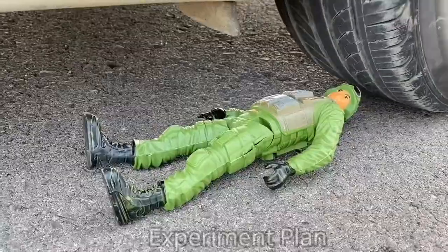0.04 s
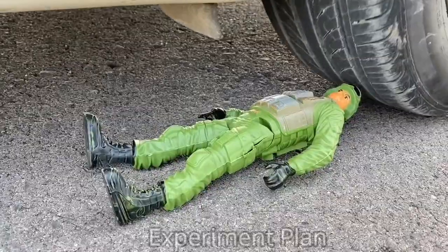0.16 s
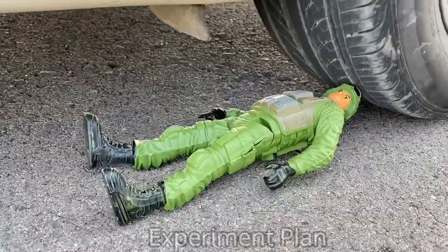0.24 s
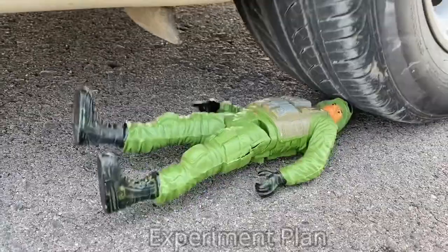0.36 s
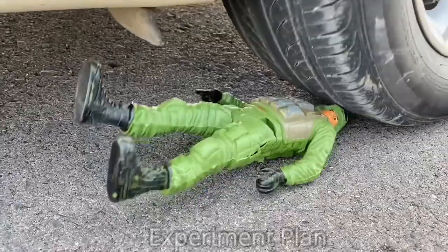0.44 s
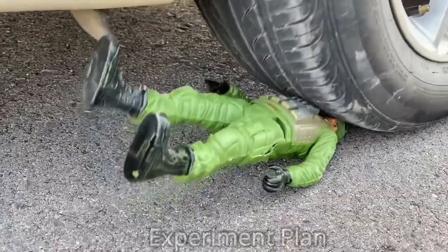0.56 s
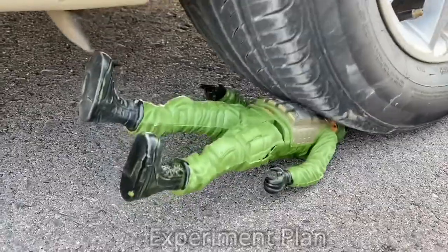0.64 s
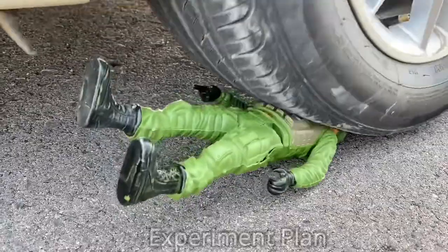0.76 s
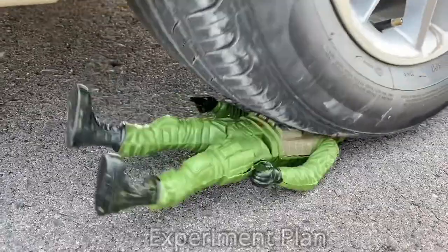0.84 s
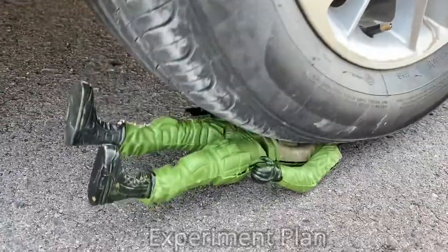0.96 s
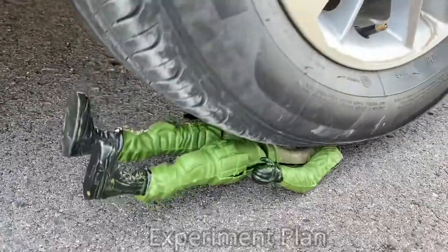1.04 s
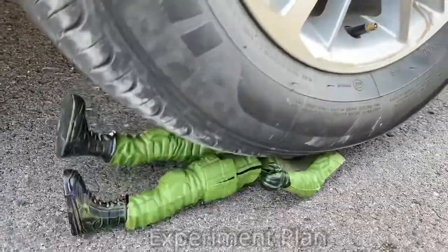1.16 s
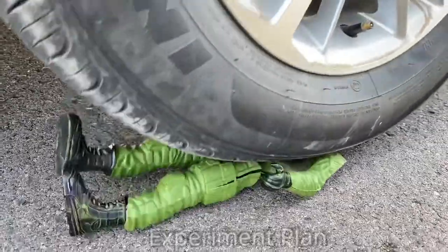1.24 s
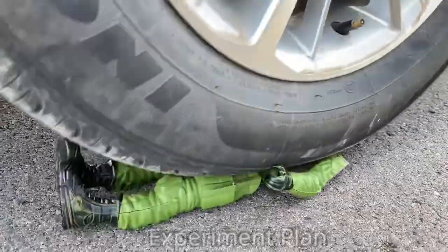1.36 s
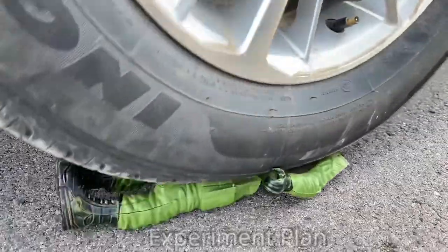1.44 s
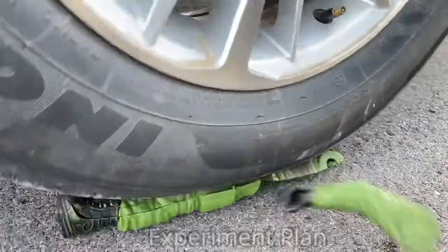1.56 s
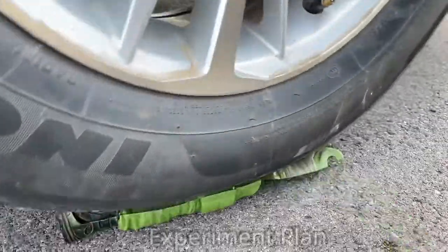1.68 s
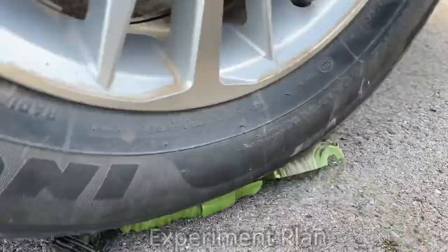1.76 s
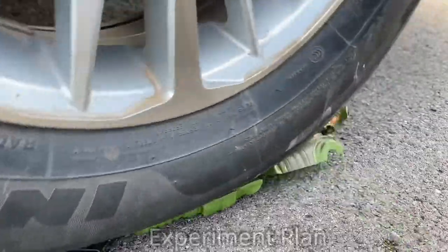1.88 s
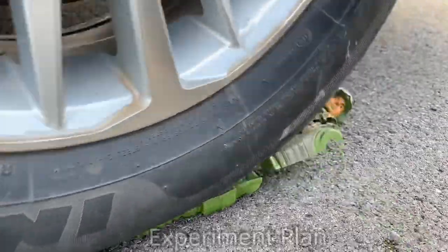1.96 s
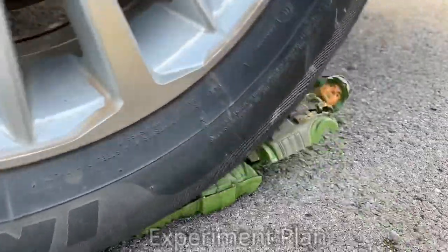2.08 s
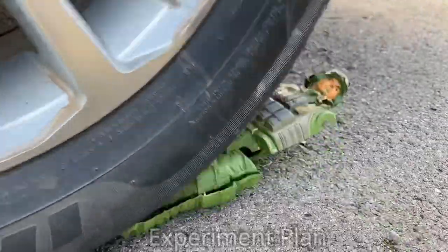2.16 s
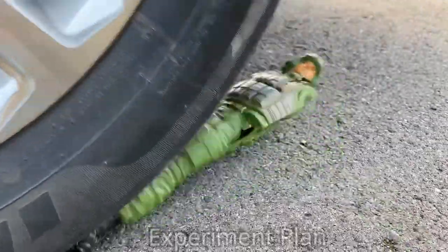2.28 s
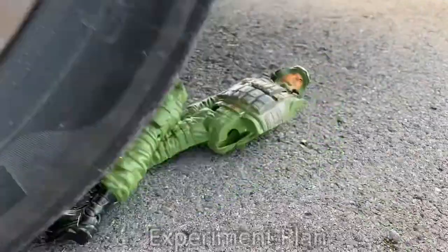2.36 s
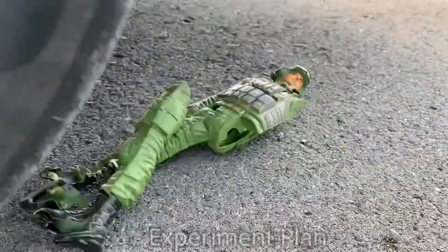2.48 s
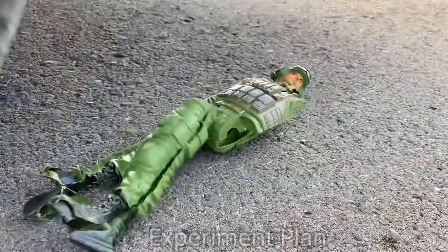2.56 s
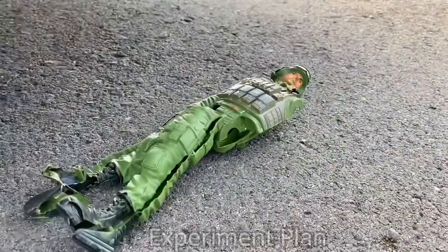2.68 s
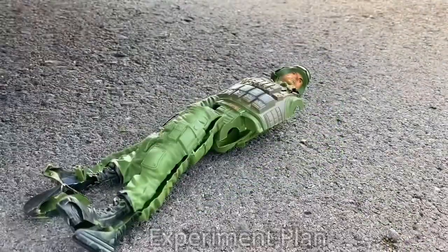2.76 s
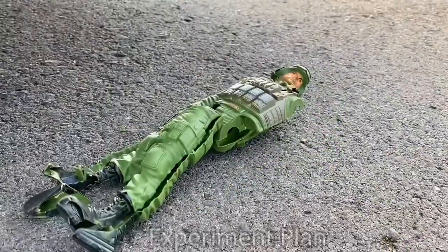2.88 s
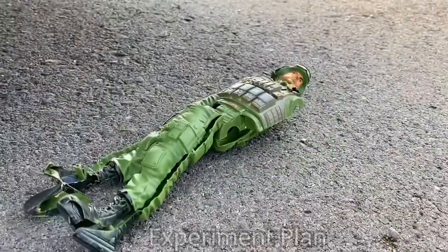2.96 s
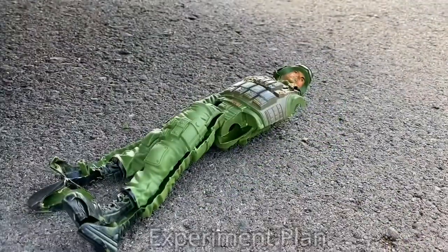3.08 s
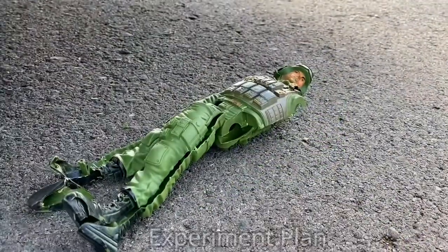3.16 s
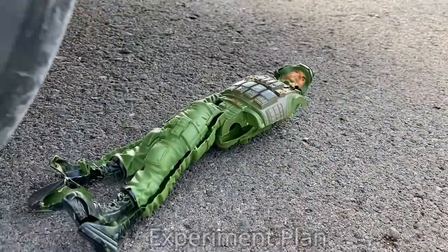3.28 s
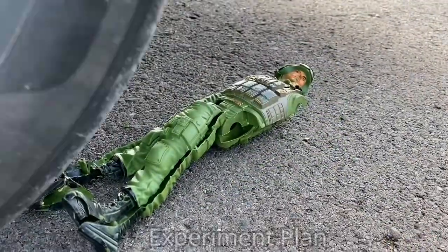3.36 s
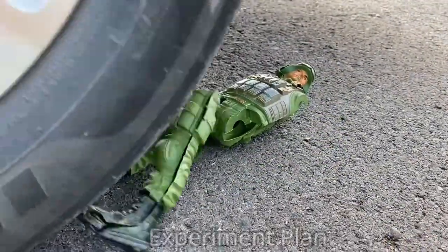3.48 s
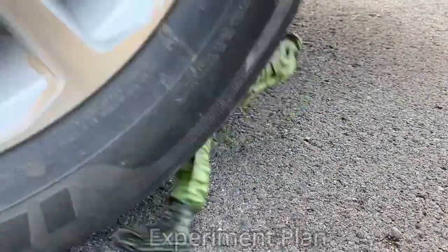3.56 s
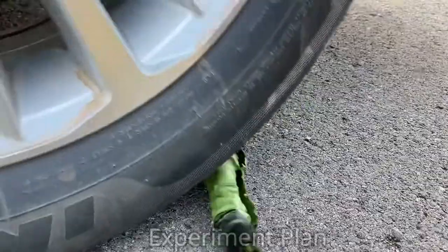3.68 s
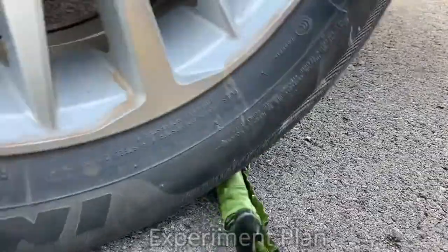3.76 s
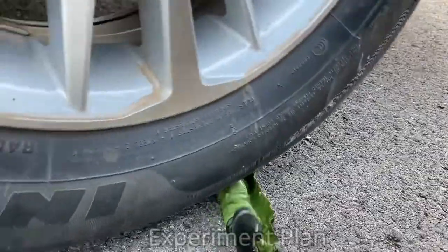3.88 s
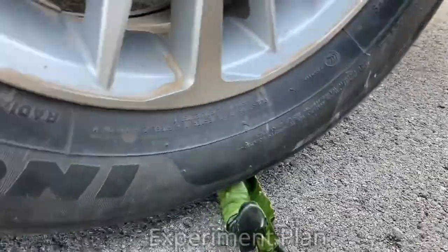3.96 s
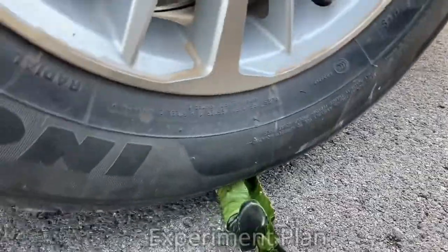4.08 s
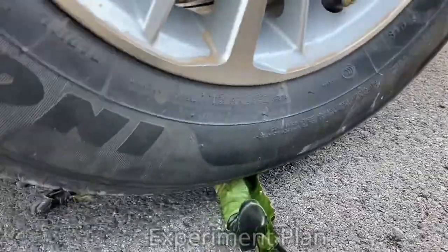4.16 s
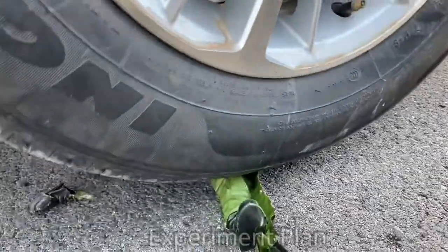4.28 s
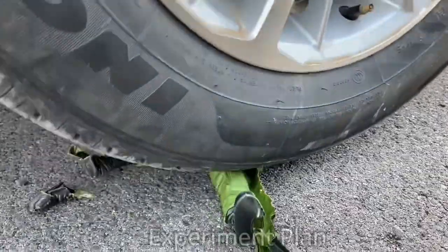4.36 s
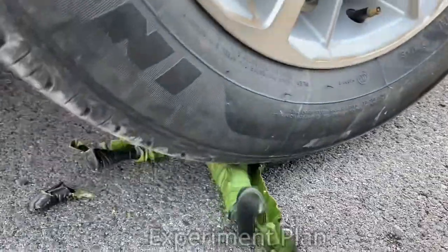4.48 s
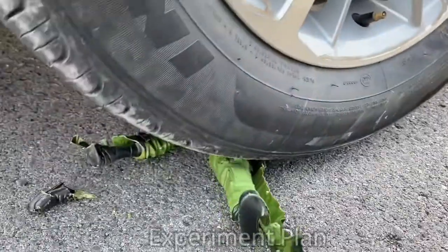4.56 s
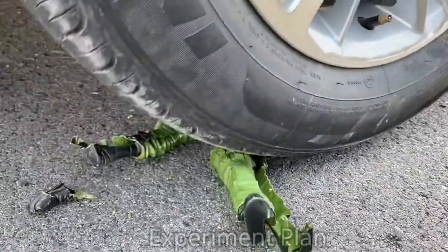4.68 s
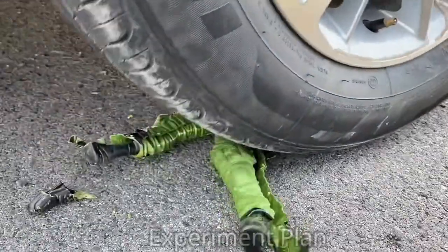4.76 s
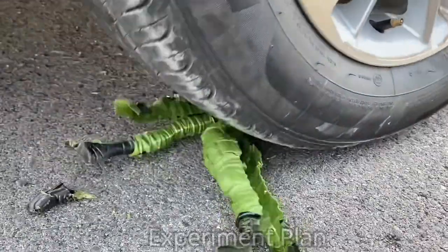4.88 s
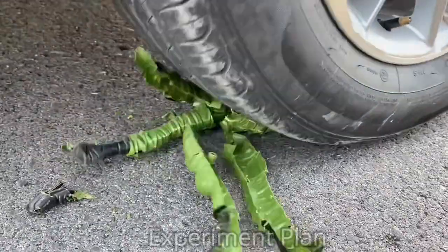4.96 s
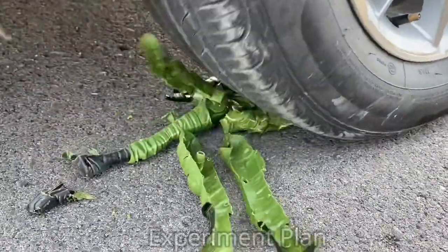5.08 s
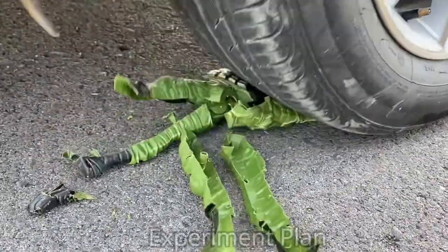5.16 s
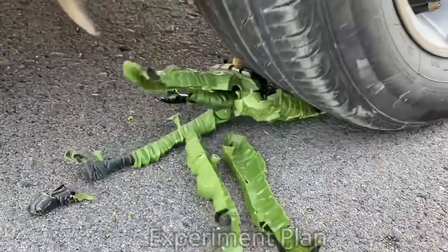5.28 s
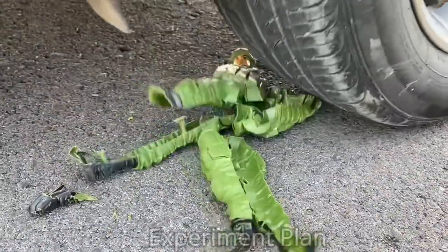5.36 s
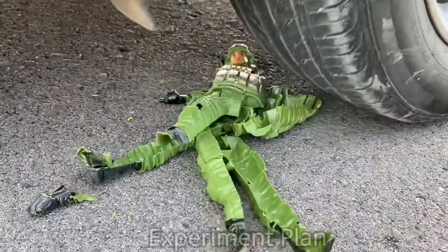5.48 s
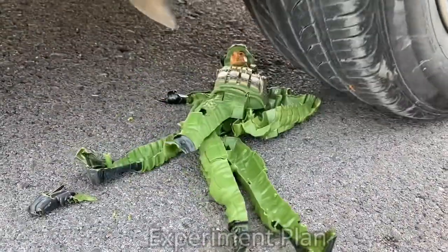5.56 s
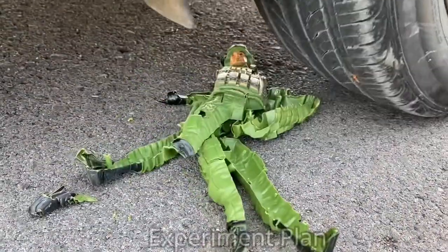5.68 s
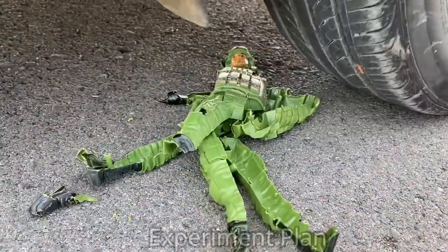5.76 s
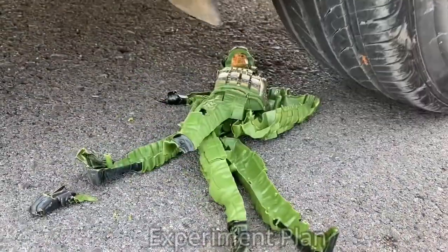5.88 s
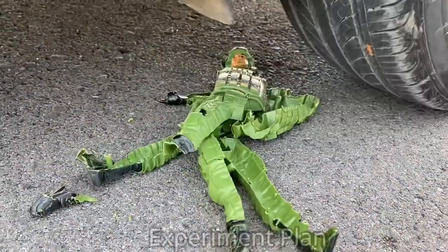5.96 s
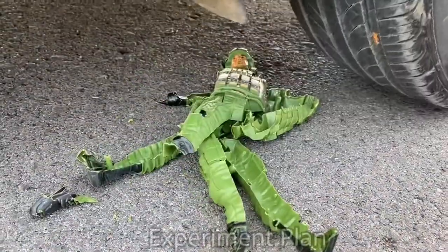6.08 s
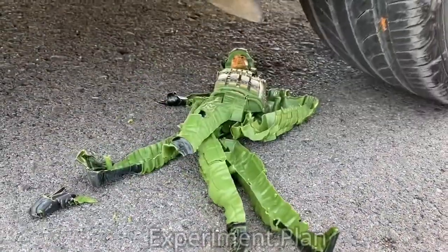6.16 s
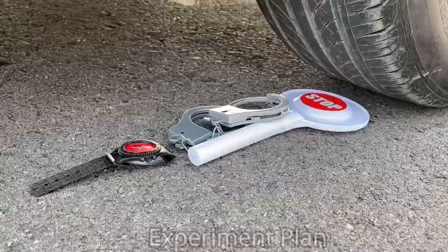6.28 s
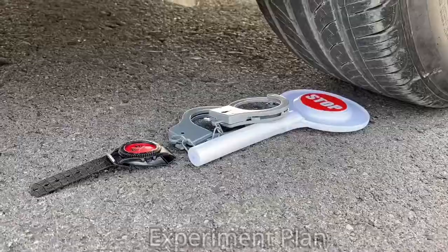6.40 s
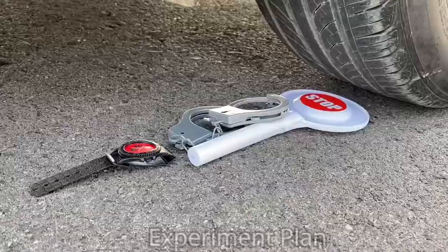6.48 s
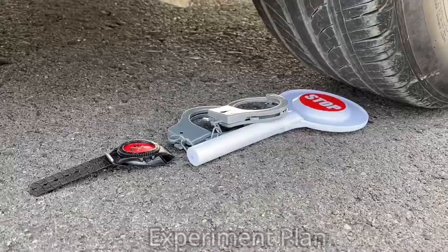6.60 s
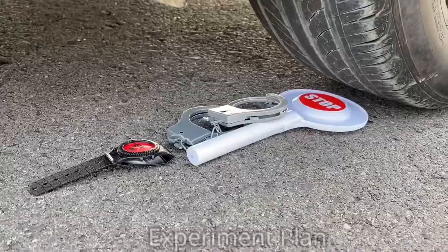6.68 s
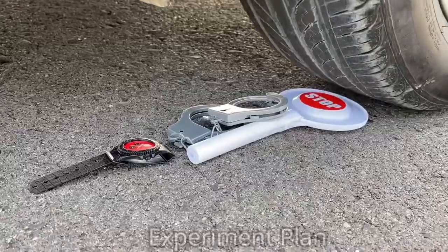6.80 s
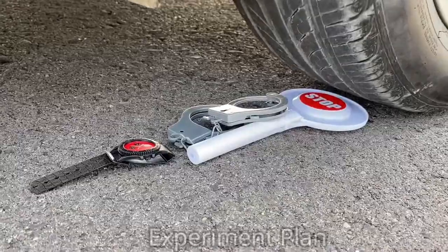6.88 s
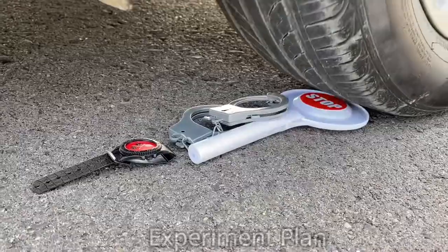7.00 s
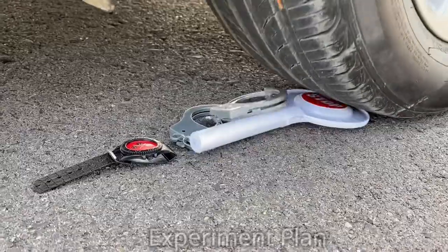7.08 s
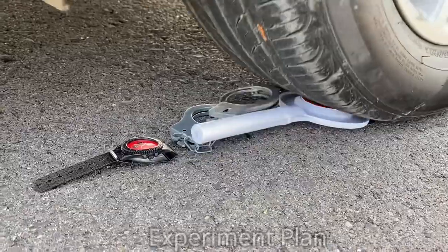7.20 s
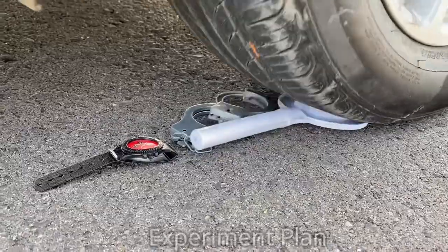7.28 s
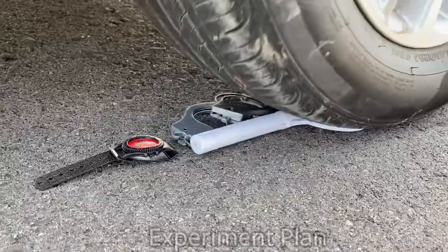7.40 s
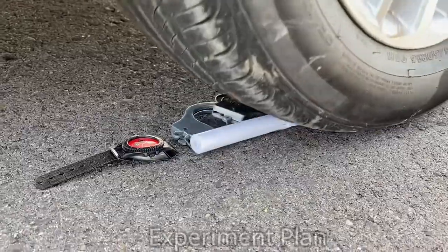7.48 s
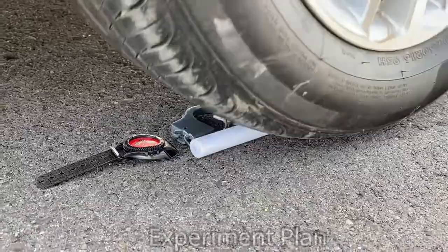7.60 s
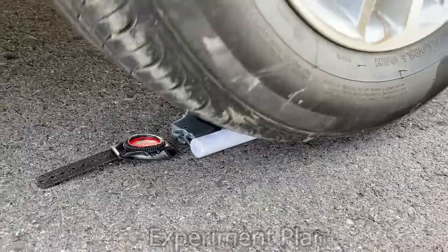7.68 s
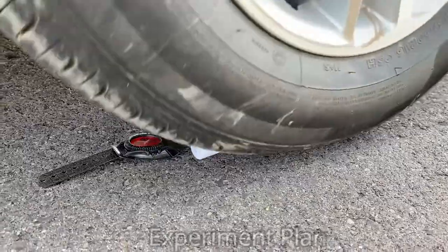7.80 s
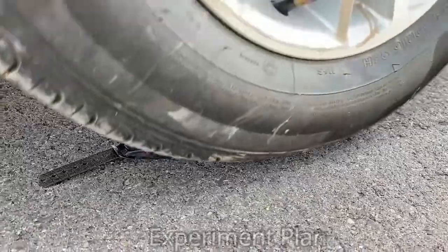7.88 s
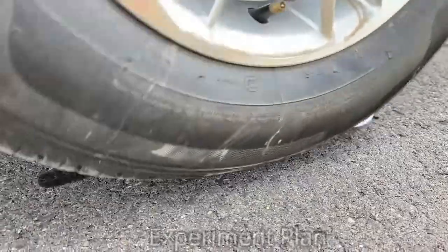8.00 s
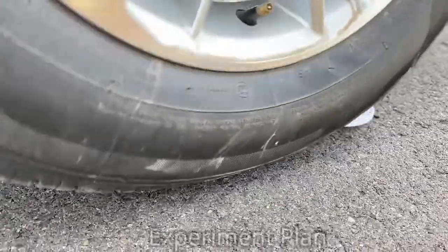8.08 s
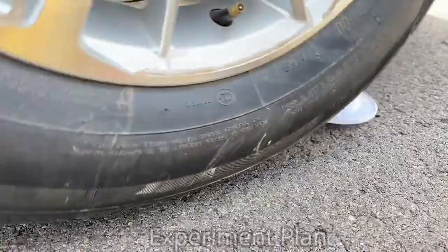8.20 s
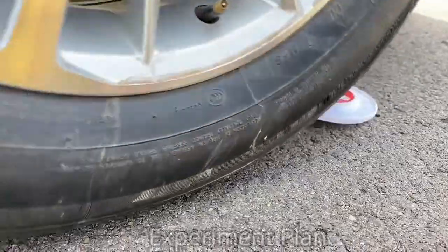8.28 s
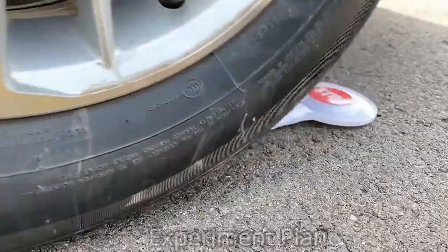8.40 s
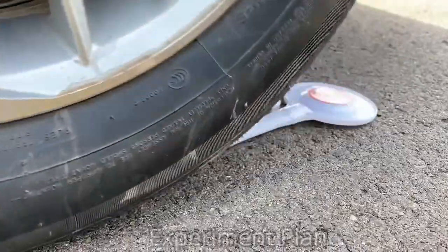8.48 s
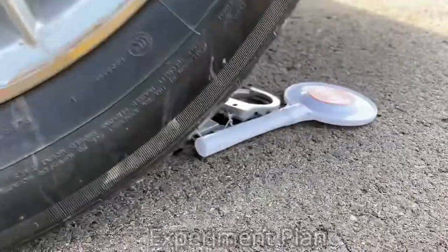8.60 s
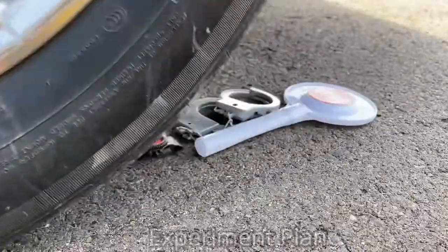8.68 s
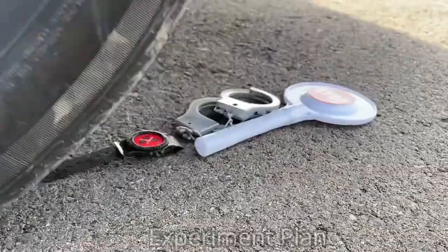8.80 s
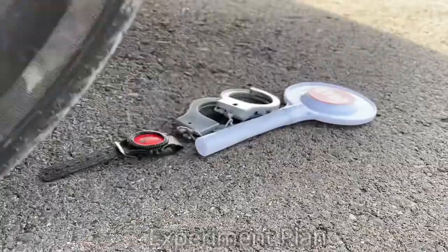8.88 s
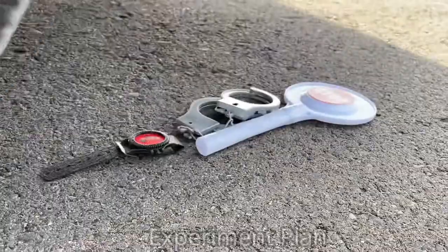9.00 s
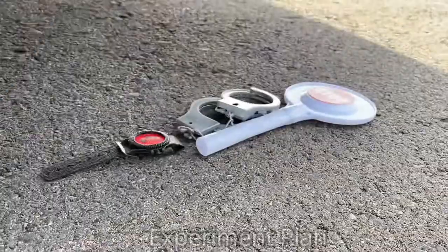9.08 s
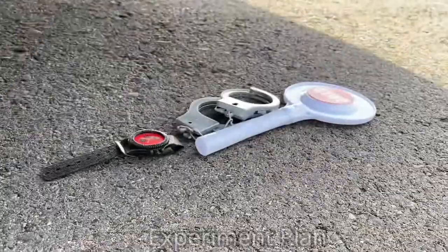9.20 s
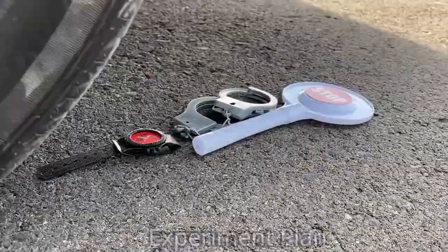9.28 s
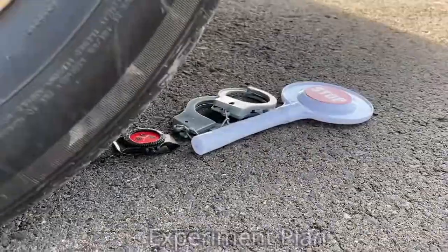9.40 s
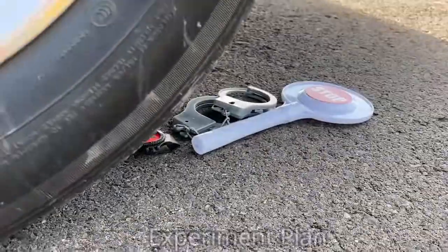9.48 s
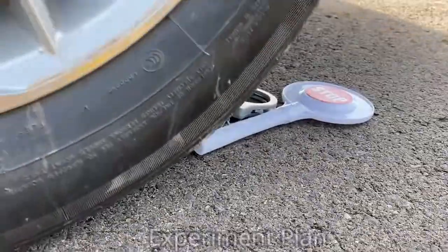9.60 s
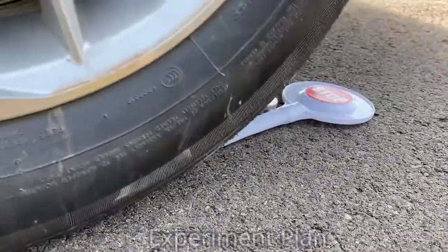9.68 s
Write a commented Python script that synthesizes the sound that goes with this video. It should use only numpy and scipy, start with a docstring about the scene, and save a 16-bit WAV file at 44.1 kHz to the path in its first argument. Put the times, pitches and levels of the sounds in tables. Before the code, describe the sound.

Three slow passes of a car tyre over hard plastic toys outdoors. The first is a loud, irregular run of snaps, crunches and thumps; the second is shorter and thins out; the third is brief, with ticks, knocks and pops. Between them only faint rumble, soft engine whine and rubber scuffs remain. A phone microphone lies close by, dry, with short echoes beneath the car and cracks slightly left.

```python
"""On asphalt, close to a phone on the ground, a car tyre rolls slowly over hollow plastic toys in three passes.
Each break is an impulse and a run of smaller fractures that excite shell modes and echo briefly under the car.
Some panels snap through with one clear decaying note; thumps are sinking sines with carcass, air cavity and rim modes.
Resonant random slips make rubber rub, and random ticks make grit crackle.
Behind them lie shaped noise for the car's low rumble and hiss, and resonant noise for its engine."""
import sys
import numpy as np
from scipy import signal
from scipy.fft import rfft, irfft
from scipy.io import wavfile
from scipy.ndimage import uniform_filter1d

SR = 44100
rng = np.random.default_rng(int(sys.argv[2]) if len(sys.argv) > 2 else 0)


def wav_out(sig):
    """Save sig, one row per channel (or a flat mono array), as 16-bit PCM at SR to the path in sys.argv[1]."""
    wavfile.write(sys.argv[1], SR, np.round(np.clip(np.atleast_2d(sig).T, -1, 1) * 32767).astype(np.int16))


N = 429534
TIME = np.arange(N) / SR
BURST_TIME = TIME[:SR // 6]

# Loud breaks: t/s, nominal shell-band level/dB over 10 ms, body level/dB re shell band,
# edge level/dB re shell band, shell ring f/Hz
BREAKS = [(0.3459, -27, -3.5, -9.5, 1420), (0.4342, -31, -3.5, 14, 9240), (0.439, -16, -0.5, -10, 1460),
          (0.4538, -22.5, 7, -16, 600), (0.47, -17, -11, -11, 1540), (0.4722, -15.5, -10, 1, 6600),
          (0.492, -34.5, 5, -19.5, 650), (0.522, -15.5, -5, -4, 1940), (0.68, -17, -11.5, -11, 1510),
          (0.7494, -26, 1, 7.5, 6520), (0.7583, -16, -4, 2, 3300), (0.7763, -23.5, 2, 2.5, 720),
          (0.8397, -28, -10.5, -2, 3170), (0.8796, -33.5, -6, -17, 1880), (0.891, -40, -7, -0.5, 2400),
          (0.9118, -23, -16, -3.5, 2320), (1.0044, -25.5, -6.5, 2.5, 5900), (1.0169, -28, -5, 4.5, 3450),
          (1.022, -19, 4.5, 3, 424), (1.0356, -18, -11, 0.5, 3700), (1.06, -30, -11.5, -8.5, 1600),
          (1.075, -25, -1.5, -13, 1580), (1.1025, -35.5, 1.5, -6.5, 650), (1.1353, -34.5, -8.5, -1, 2760),
          (1.1463, -27, 0, -5.5, 730), (1.1908, -19, -7.5, 0, 9200), (1.2154, -37, -9, 4, 3980),
          (1.245, -37.5, -12, 4.5, 4200), (1.2567, -14, -2, -1, 1960), (1.308, -30.5, -15, 2, 3340),
          (1.3688, -33.5, -7, -2.5, 1150), (1.4586, -35, -20, -1.5, 1980), (1.4885, -18.5, -6, -1.5, 1520),
          (1.514, -27, -16.5, -10, 2400), (1.5507, -16, -13, -11.5, 1560), (1.575, -19, 3.5, 0.5, 875),
          (1.6668, -13, -2.5, -1, 1250), (1.6928, -31, 2, -0.5, 895), (1.736, -23, -1, -3, 3190),
          (1.8465, -31, 4.5, 9.5, 8900), (1.882, -30.5, 4.5, -1, 650), (1.9991, -28, 3.5, 0, 800),
          (2.0762, -36, -2.5, 0.5, 1920), (2.0898, -43.5, -7, 11, 7370), (2.196, -34.5, -13, 0, 2860),
          (2.268, -44.5, -10, -9, 1700), (2.29, -34.5, -26, -9.5, 1750), (2.3786, -43.5, -33, -3, 1780),
          (2.5452, -48, -6, -4.5, 1970), (3.461, -40, -5, -1.5, 2400), (3.4802, -41, -5, 13, 4660),
          (3.4873, -31.5, -4, 12.5, 4680), (3.518, -30, -0.5, 6, 3950), (3.664, -25.5, 5, 2.5, 860),
          (3.693, -29, 1.5, -2, 2070), (3.701, -27.5, 4, -1, 680), (3.7415, -19.5, -2, 0.5, 885),
          (3.764, -24, -4, -3.5, 1110), (3.78, -20, -2.5, 2, 3500), (3.83, -19.5, -10, -7, 1905),
          (3.836, -22.5, -17, -1.5, 2400), (3.998, -17.5, -10.5, -4.5, 2310), (4.03, -33.5, -12, -19, 1990),
          (4.0829, -29, -2.5, -4.5, 5300), (4.1246, -30.5, -18, -5, 3170), (4.1827, -37.5, -12, -1, 5400),
          (4.296, -36, -16.5, -11.5, 1860), (4.3663, -33, -7, -12, 1833), (4.485, -17, -0.5, -7.5, 1525),
          (4.5791, -34.5, -0.5, -2, 2200), (4.6528, -37, -0.5, -10, 747), (4.714, -35, -18.5, -5.5, 2060),
          (4.781, -38, -3.5, -3.5, 2850), (4.9682, -46, -4, -5.5, 1170), (4.9923, -41, -9, -5, 1080),
          (5.057, -37, 0, -5.5, 920), (5.1173, -41, -5, -3.5, 1800), (5.3276, -44, -8.5, -2.5, 1600),
          (5.381, -43.5, -19, -4.5, 1840), (7.042, -47.5, 2.5, 10.5, 7800), (7.181, -48.5, -2, 7, 4630),
          (7.214, -57, 0, 8, 5200), (7.2574, -53, 1, 13.5, 5050), (7.3354, -49, 1, 0.5, 1340),
          (7.4376, -24, 8, -3, 434), (7.4949, -24.5, -11, 1.5, 1220), (7.547, -38, -16, -28, 2070),
          (7.5902, -23.5, 7.5, 0.5, 584), (7.6405, -33.5, -2, 11.5, 5830), (7.7078, -38.5, 2.5, 11.5, 9100),
          (7.724, -31.5, -1.5, 13, 6750), (7.743, -47, 7, -6, 950), (7.773, -22.5, 5, 4, 340),
          (7.8791, -23.5, -11.5, -3, 3280), (8.0474, -38.5, -4.5, 2.5, 4660), (8.063, -31.5, 3.5, 4.5, 820),
          (8.1863, -27, 1.5, 6, 7650), (8.35, -43, 5, 2, 930), (9.7028, -28.5, -18, 0, 3550),
          (9.733, -41, 3, -5, 600)]
# Tyre on a toy: start t/s, end t/s, grinding level/dB, edge level of the small snaps/dB re shell band
TOY_PASSES = [(0.199, 2.55, -60, 1), (3.395, 5.38, -59, -6), (7.003, 7.8, -53.5, 9)]
BITE_SHARE = 0.18  # a crunch or rub builds over this share of its length, then dies away


def undb(db):
    """Level: decibels to amplitude gain."""
    return 10 ** (np.asarray(db) / 20)


def unit(x):
    """Normalisation: scale to rms 1."""
    return x / np.sqrt(np.mean(x ** 2) + 1e-20)


def fade(t, t60):
    """Exponential decay: a fall of 60 dB in t60 seconds."""
    return np.exp(-np.log(1000) * t / t60)


def curve(rows):
    """Envelope: gain interpolated in decibels between (t/s, level/dB) rows, silent outside them."""
    return undb(np.interp(TIME, *np.transpose(rows), left=-np.inf, right=-np.inf))


def band(x, lo_hz, hi_hz, order=2):
    """Causal band-pass filtering."""
    edges_hz = [lo_hz, min(hi_hz, .45 * SR)]
    return signal.sosfilt(signal.butter(order, edges_hz, "band", fs=SR, output="sos"), x)


def resonate(x, hz, width_hz):
    """Resonance: one damped mode with gain 1 at its centre."""
    return signal.lfilter(*signal.iirpeak(hz, hz / width_hz, fs=SR), x)


def colour(x, points):
    """Spectral shaping by (f/Hz, level/dB) points, falling off beyond the ends, at rms 1."""
    hz, db = np.transpose(points)
    f = np.fft.rfftfreq(N, 1 / SR) + 1
    ends = np.minimum(f / hz[0], 1) ** 2 * np.minimum(hz[-1] / f, 1) ** 2
    gain = ends * undb(np.interp(np.log(f), np.log(hz), db))
    return unit(irfft(rfft(x) * gain, N))


def pair(size, spread):
    """Partial stereo coherence: left and right noise from mid and side; spread is side over mid."""
    mid, side = rng.standard_normal((2, size))
    return np.array([mid + spread * side, mid - spread * side]) / np.hypot(1, spread)


def walk(rate):
    """Slow random modulation: chance values, rate per second, joined by straight lines."""
    size = int(SR / rate)
    steps = np.repeat(rng.standard_normal(N // size + 1), size)
    return uniform_filter1d(steps, size)[:N]


def add(out, s, sound):
    """Superposition: mix a sound in at time s."""
    i = int(s * SR)
    out[:, i:i + sound.shape[-1]] += sound[..., :N - i]


def swell(start_s, end_s, attack_s):
    """Attack and decay: a linear build-up, a hold and an exponential release."""
    release_t60_s = 0.1
    attack = np.clip((TIME - start_s) / attack_s, 0, 1)
    return attack * fade(np.clip(TIME - end_s, 0, 2), release_t60_s)


def fragment(x, lo_hz, hi_hz, mode_db, count=5):
    """Modal resonance: a piece of plastic has a few damped modes, each louder toward one side."""
    spaced_hz = np.geomspace(lo_hz, hi_hz, count)
    pitches = np.minimum(spaced_hz * 2 ** rng.uniform(-0.496, .5, count), SR / 3)
    sides = undb(2 * rng.standard_normal((count, 2, 1)))
    modes = sum(side * resonate(x, hz, 130 + hz / 80) for hz, side in zip(pitches, sides))
    return x + undb(mode_db) * modes


def engine(whirr_hz=2080, whirr_width_hz=400, whirr_db=-3, line_width_hz=40):
    """Narrow-band noise: a soft whirr with narrow, unsteady lines of whine standing in it."""
    # Common envelope of whirr and whine: t/s, level/dB before whirr_db and the line levels
    whirr_rows = [(0, -67), (2.6, -72), (3.3, -81), (6.1, -78), (6.25, -73.5), (8.2, -67.5), (8.85, -55),
                  (9.2, -59), (9.3, -73)]
    # Lines of whine: f/Hz, level/dB re the common envelope
    whine_rows = [(1475, -18), (2000, -8)]

    def hum(hz, width):
        """Twice-resonated noise at rms 1."""
        once = resonate(pair(N, spread=0.57), hz, width)
        return unit(resonate(once, hz, width))

    whine = sum(undb(db) * hum(hz, line_width_hz) for hz, db in whine_rows)
    return (undb(whirr_db) * hum(whirr_hz, whirr_width_hz) + whine) * curve(whirr_rows)


def car(crush, rumble_db=3.5, hiss_db=-2):
    """Broadband noise: a low, wavering rumble that grows under load, with engine and faint hiss."""
    # Rumble envelope: t/s, level/dB before rumble_db
    roll_rows = [(0.0, -48.5), (0.57, -50.5), (1.82, -49.5), (2.14, -56.5), (3.23, -70), (3.47, -63.5),
                 (3.66, -48), (3.88, -45), (4.12, -60.5), (6.18, -63.5), (6.43, -48), (7.02, -54),
                 (7.59, -47), (7.84, -55.5), (9.58, -52.5), (9.74, -47)]
    # Hiss envelope of car and yard: t/s, level/dB before hiss_db
    air_rows = [(0, -61.5), (2.4, -67), (2.9, -72), (6.2, -67.5), (6.6, -65.5), (8.1, -60), (8.5, -53.5),
                (9.3, -57), (9.74, -51)]
    # Rumble spectrum: f/Hz, relative level/dB per Hz
    roll_spectrum = [(25, -26), (49, 1), (97, 1), (156, -3.5), (193, -9.5), (299, -18.5), (500, -26.5),
                     (650, -57.5), (1100, -120)]
    # Hiss spectrum: f/Hz, relative level/dB per Hz
    air_spectrum = [(180, -28.5), (300, -7.5), (700, -11), (1210, -17), (2030, -16), (3350, -20),
                    (10400, -29.5), (12100, -34.5), (13800, -24.5), (16000, -52.5)]
    load_db = -11  # labouring tyre re the grinding, before rumble_db
    effort = np.hypot(curve(roll_rows), undb(load_db) * crush)
    rumble = colour(pair(N, spread=.35), roll_spectrum) * effort
    hiss = colour(pair(N, spread=0.66), air_spectrum) * curve(air_rows) * undb(hiss_db)
    return rumble * undb(rumble_db + 2 * walk(19)) + (engine() + hiss) * undb(2 * walk(22))


def crushing(touch_s=0.01):
    """Energy addition: grinding gain from each pass, the tread's bites and the debris of each break."""
    # The tread bites and grinds: start t/s, length/s, grinding level/dB
    crunch_rows = [(0.185, 0.32, -58), (0.453, 0.011, -28), (1.015, 0.09, -38.5), (1.124, 0.15, -43),
                   (1.384, 0.21, -43), (1.866, 0.26, -51.5), (2.135, 0.11, -45), (3.448, 0.066, -39),
                   (3.576, 0.13, -37.5), (3.805, 0.24, -48), (4.776, 0.03, -44), (4.975, 0.17, -52.5)]
    debris_db, debris_t60_s = -27.5, 0.098  # splinters crumble on after a break; level re the break
    rolling = sum(undb(db) * swell(start, end, touch_s) for start, end, db, _ in TOY_PASSES)
    biting = sum(undb(db) * swell(s, s + length, BITE_SHARE * length) for s, length, db in crunch_rows)
    debris = np.zeros((1, N))
    for s, db, *_ in BREAKS:
        add(debris, s, undb(db + debris_db) * fade(TIME[:SR], debris_t60_s))
    return np.sqrt(rolling ** 2 + biting ** 2 + debris[0] ** 2)


def ticks(rate, uneven_db, count=10):
    """Impulse response: clustered ticks of uneven size excite a handful of splinters, each with its own modes."""
    # Grit spectrum: f/Hz, relative level/dB per Hz
    grit_spectrum = [(120, -31.5), (200, 0.5), (440, -9), (1210, -7), (2130, -8.5), (2960, -6.5),
                     (8580, -14), (10100, -15.5), (16000, -36.5)]
    chance = rate / SR * undb(4 * walk(70))
    sizes = undb(uneven_db * np.minimum(rng.exponential(size=N), 2))
    pushes = (rng.random(N) < chance) * sizes * rng.choice([-1, 1], N)
    splinter = rng.integers(0, count, N)
    t = BURST_TIME[:len(BURST_TIME) // 2]
    out = 0
    for k in range(count):
        scatter = undb(-23) * pair(len(t), spread=.8) * fade(t, .018)
        scatter[:, 0] += 1  # direct impulse
        grain = unit(fragment(scatter, lo_hz=650, hi_hz=2970, mode_db=11.5, count=3))
        out = out + signal.oaconvolve(grain, (pushes * (splinter == k))[None])[:, :N]
    return colour(out, grit_spectrum)


def grit(crush, grit_db=-1):
    """Random impulses: fine road grit crumbles under the tread while sparser splinters crackle."""
    crumble = undb(-2) * ticks(rate=650, uneven_db=4)
    crackle = ticks(rate=65, uneven_db=5)
    return (crumble + crackle) * crush * undb(grit_db)


def rub(hz, width, slips_per_s=800, uneven_db=4):
    """Stick-slip friction: half a second of uneven rubber slips and faint noise in one resonance."""
    size = SR // 2
    sizes = undb(uneven_db * rng.standard_normal(size))
    slips = (rng.random(size) < slips_per_s / SR) * sizes * rng.choice([-1, 1], size)
    grip = undb(uneven_db * walk(45)[:size])
    friction = grip * (slips + .03 * pair(size, spread=1))
    return unit(resonate(resonate(friction, hz, width * hz), hz, 2 * width * hz))


def rubs():
    """Friction envelopes: each rub builds and dies away like a crunch."""
    # Rubber sticks, slips and scuffs on the grit: t/s, length/s, level/dB before the swell,
    # resonance f/Hz, width over resonance (narrow ones creak)
    rub_rows = [(0.181, 0.25, -43, 560, 1.14), (2.18, 0.095, -43, 1270, 0.67), (3.581, 0.24, -37, 233, 1.5),
                (6.185, 0.29, -52, 230, 1), (6.209, 0.25, -62, 1800, 0.77),
                (6.256, 0.0062, -59, 1300, 0.66), (6.403, 0.023, -57, 3800, 1.7),
                (6.386, 0.038, -45.5, 292, 0.75), (6.96, 0.033, -45.5, 850, 0.7),
                (6.998, .42, -55, 10500, .45), (7.102, 0.35, -59, 980, 0.38), (8.343, 0.022, -44, 900, .45),
                (9.096, 0.036, -40.5, 380, 1.33), (9.213, 0.012, -38.5, 402, 2.1)]
    out = np.zeros((2, N))
    for s, length, db, hz, width in rub_rows:
        i = int(s * SR)
        sound = rub(hz, width)[:, :N - i]
        envelope = swell(s, s + length, BITE_SHARE * length)[i:i + sound.shape[1]]
        add(out, s, undb(db) * sound * envelope)
    return out


def thump(db, hz, t60, push_s, ring_db, sag=1.0, sag_s=0.002,
          carcass_hz=56, carcass_db=-18.5, carcass_t60=0.33):
    """Modal excitation: rubber lands, its pitch sinking as the load spreads; carcass, cavity and rim ring."""
    # Air cavity of the tyre and the rim: f/Hz, level/dB re the wheel ring, t60/s
    wheel_modes = [(108.5, -1.5, 0.52), (221, 5.5, 1), (670, 3, .9)]
    miss_db_per_octave = 6.5  # a mode rings less the further the thump's pitch lies from it
    t = TIME[:SR]
    # so near, the two sides are pushed out of step
    skew = np.array([[.5], [-.5]]) * rng.uniform(-1, 1)
    sinking_hz = hz * (1 + sag * np.exp(-t / sag_s))
    rubber = np.sin(2 * np.pi * np.cumsum(sinking_hz) / SR + 2 * skew) * fade(t, t60)
    wheel = 0
    for f, mode_db, ring_t60 in wheel_modes:
        gain = undb(mode_db - miss_db_per_octave * abs(np.log2(f / hz)))
        wheel = wheel + gain * np.sin(2 * np.pi * f * t) * fade(t, ring_t60)
    # a slow push shakes the carcass less
    shake = undb(carcass_db) * min(1, sag_s / push_s)
    carcass = shake * np.sin(2 * np.pi * carcass_hz * t + skew) * fade(t, carcass_t60)
    return undb(db) * (1 - np.exp(-t / push_s)) * (rubber + carcass + undb(ring_db) * wheel)


def pop(db, hz, t60):
    """Snap-through buckling: a curved panel swells into one note and dies away."""
    rise_s = 0.0015  # time constant of the snap-through
    phase = rng.uniform(0, 2 * np.pi) + rng.uniform(-0.32, .5, (2, 1))
    note = np.sin(2 * np.pi * hz * BURST_TIME + phase)
    return undb(db) * note * (1 - np.exp(-BURST_TIME / rise_s)) * fade(BURST_TIME, t60)


def small_snaps(crush, colour_spread_db=4, ring_spread_octaves=0.55):
    """Random fracture: chance breaks on each toy, louder the harder the tyre grinds; rows as in BREAKS."""
    snaps_per_s, snap_db, snap_spread_db = 13, 3.5, 3  # level re the grinding, before the edge allowance
    body_db, snap_ring_hz = -5, 2200  # centres of the random spread
    rows = []
    for start, end, _, edge_db in TOY_PASSES:
        count = int((end - start) * snaps_per_s)
        times = rng.uniform(start, end, count)
        for s, (size, body, edge, ring) in zip(times, rng.uniform(-1.7, 1.7, (count, 4))):
            level_db = 20 * np.log10(crush[int(s * SR)] + 1e-9) + snap_db + snap_spread_db * size
            rows.append((s, level_db - edge_db / 2, body_db + colour_spread_db * body,
                         edge_db + colour_spread_db * edge,
                         snap_ring_hz * 2 ** (ring_spread_octaves * ring)))
    return rows


def fracture(tear_s, count=14, follow_db=-6):
    """Crack propagation: a first snap, then smaller slips of uneven size as the crack runs on."""
    when = rng.uniform(0, 1.5, count) ** 1.5 * tear_s
    sizes = undb(follow_db + 4.1 * rng.standard_normal(count)) * np.exp(-when / tear_s * 0.29)
    sizes = sizes * rng.choice([-1, 1], count)
    push = np.zeros(len(BURST_TIME))
    push[0] = 1
    np.add.at(push, np.minimum(when * SR, len(push) - 1).astype(int), sizes)
    return push


def shell_ring(detune_octaves=0.04):
    """Free vibration: shell modes die away, tuned a little differently as the shell is bent out of shape."""
    # Modes of the hollow shell: f/Hz before detuning, level/dB re the break, t60/s
    shell_modes = [(1943, -9.5, 0.052), (2300, -17.5, 0.12), (4576, -24, 0.049)]
    count = len(shell_modes)
    bend = 2 ** (detune_octaves * rng.standard_normal())
    phases = rng.uniform(0, 2 * np.pi, (count, 1, 1)) + rng.uniform(-0.75, 1, (count, 2, 1))
    out = 0
    for (hz, db, t60), phase in zip(shell_modes, phases):
        mode = np.sin(2 * np.pi * hz * bend * BURST_TIME + phase)
        out = out + undb(db) * mode * fade(BURST_TIME, t60)
    return out


def crack(level_db, body_db, edge_db, ring_hz, tear_s, scatter_db=-21, scatter_t60=0.029, ring_db=8.0,
          edge_hz=5500, sidewall_hz=440, sidewall_db=-0.5, hollow=0.57, pan_db=1.3):
    """Impulsive excitation: a fracture rings the shell, knocks the sidewall and scatters under the car."""
    # Body, shell and edge bands: low f/Hz, high f/Hz
    break_bands = [(250, 1000), (1000, 3000), (3000, 16000)]
    # Echo under the car, one row a band: t60/s, level/dB re direct sound, stereo width of the whole band
    echo_rows = [(0.077, -15.5, 0.45), (0.048, -12.5, 1), (0.097, -26.5, 0.67)]
    t = BURST_TIME
    # scattering between tyre, road and floor pan
    near = undb(scatter_db) * pair(len(t), spread=0.95) * fade(t, scatter_t60)
    near[:, 0] += 1
    snap = signal.fftconvolve(near, fracture(tear_s)[None])[:, :len(t)]
    # the first snap sets the shell's note; a dull, hollow pop is mostly this note
    note = resonate(near, ring_hz, 230) * np.std(snap) / np.std(near)
    hollow_db = -hollow * min(edge_db, 0)
    ring = undb(ring_db + hollow_db) * note
    knock = undb(sidewall_db) * resonate(snap, sidewall_hz, sidewall_hz)
    snap = fragment(snap + ring, lo_hz=1150, hi_hz=9000, mode_db=0.0) + knock
    # slow bending waves bring the low notes a moment late (an all-pass)
    snap = snap - 2 * resonate(snap, sidewall_hz, sidewall_hz)
    # the more brittle the break, the higher its treble reaches
    corner_hz = min(edge_hz * undb(edge_db), SR / 3)
    low_pass = signal.butter(1, corner_hz, fs=SR, output="sos")
    snap = signal.sosfilt(low_pass, snap) + undb(-19.0) * snap
    out = 0
    for (lo, hi), db, (t60, echo_db, width) in zip(break_bands, (body_db, 0, edge_db), echo_rows):
        direct = unit(band(snap, lo, hi, order=3))
        build_up = 1 - np.exp(-t / 0.014)
        echo = unit(band(pair(len(t), spread=0.11), lo, hi) * fade(t, t60) * build_up)
        part = undb(level_db + db) * (direct + undb(echo_db) * echo)
        out = out + width * part + (1 - width) * part.mean(axis=0)
    # the toys lie a little to the left, each break in its own place
    sides = undb((pan_db + rng.uniform(-1, 1)) * np.array([[.5], [-.5]]))
    ten_ms = np.sqrt(SR / 100 / len(t))  # refers the burst's energy to 10 ms
    return sides * out * ten_ms + undb(level_db) * shell_ring()


def scene(crack_db=0, thump_db=0):
    """Superposition of all sources; brittle breaks run faster and low thumps last longer."""
    # The tyre drops or bumps: t/s, level/dB before the push, settled f/Hz, push time constant/s,
    # wheel ring level/dB re the thump
    thump_rows = [(0.454, -16, 148.7, 0.00091, -25.5), (0.758, -18, 163.7, .001, -27.5),
                  (1.0266, -7.5, 130.7, 0.0017, -37), (1.2609, -19, 86.16, 0.00091, -22),
                  (1.673, -10, 116.3, 0.00089, -33.5), (1.737, -18, 83.7, 0.00086, -31.5),
                  (3.7816, -9, 122.7, .001, -32.5), (4.4894, -14, 113.3, 0.0011, -20.5),
                  (7.438, -18.5, 133.7, .001, -29), (7.591, -15, 416, 0.0013, -27.5),
                  (7.7744, -11.5, 175, .001, -45.5), (9.104, -5.5, 152, 0.0088, -48),
                  (9.216, -10, 152, .008, -56)]
    # A hollow panel pops with a clear note: t/s, level/dB before rise and decay, f/Hz, t60/s
    pop_rows = [(0.471, -14, 6530, .025), (0.6797, -1, 1905, 0.027), (1.549, -10, 1214, 0.028),
                (3.998, -16, 1963, 0.047), (4.296, -32.5, 2700, .034), (7.768, -6.5, 2200, 0.026)]
    thump_cycles = 8.5  # settled periods in which the rubber dies away by 60 dB
    longest_tear_s, brittle = .0027, .6  # crack time scale; dB by which each dB of positive edge shortens it
    crush = crushing()
    out = car(crush) + grit(crush) + rubs()
    for s, db, hz, push_s, ring_db in thump_rows:
        add(out, s, undb(thump_db) * thump(db, hz, thump_cycles / hz, push_s, ring_db))
    for s, db, hz, t60 in pop_rows:
        add(out, s, pop(db, hz, t60))
    for s, db, body_db, edge_db, ring_hz in BREAKS + small_snaps(crush):
        tear_s = longest_tear_s * undb(-brittle * max(edge_db, 0))
        add(out, s, undb(crack_db) * crack(db, body_db, edge_db, ring_hz, tear_s))
    return out


def record(dry):
    """Phase difference and saturation: two ports differ in phase; the phone rounds peaks and cuts the top."""
    # Phase between the two microphone ports: f/Hz, left lead/rad (negative: right leads)
    port_phase = [(1600, 0.5), (2200, 1.27), (3200, 1.03), (5000, 1), (6800, -1), (16400, -16.5)]
    top_hz = 15800
    lag = np.interp(np.fft.rfftfreq(N, 1 / SR), *np.transpose(port_phase))
    ports = np.array([dry[0], irfft(rfft(dry[1]) * np.exp(-1j * lag), N)])
    low_pass = signal.ellip(8, .2, 70, top_hz, fs=SR, output="sos")
    return signal.sosfilt(low_pass, np.tanh(ports))


dry = scene()
out = record(dry)
wav_out(out)
```